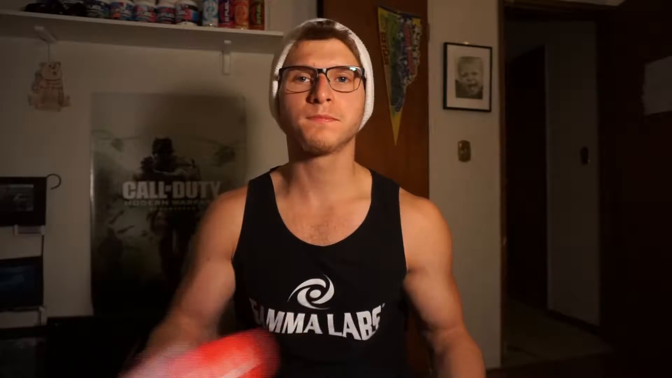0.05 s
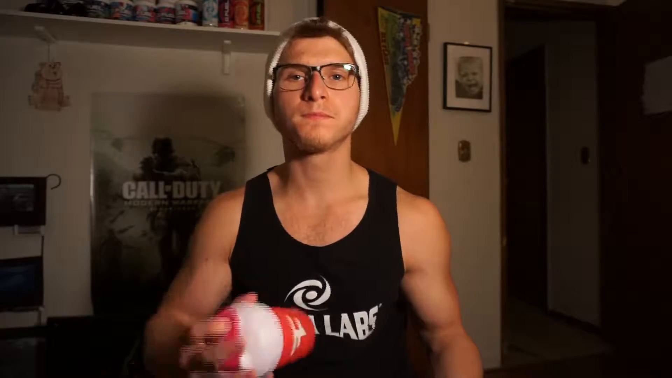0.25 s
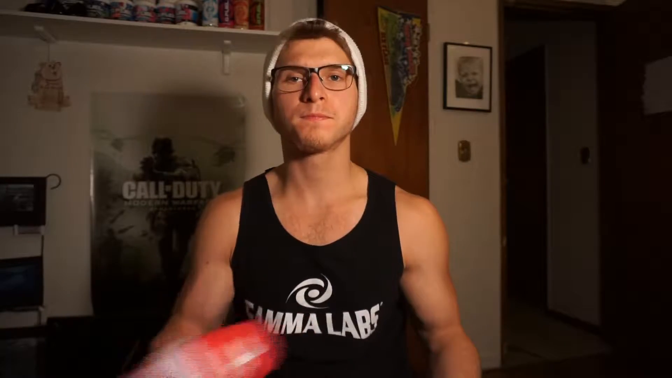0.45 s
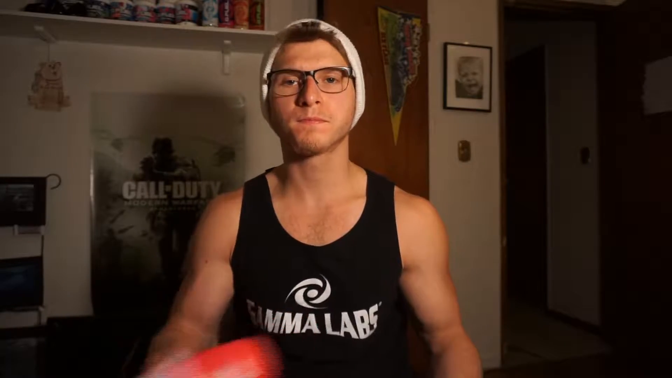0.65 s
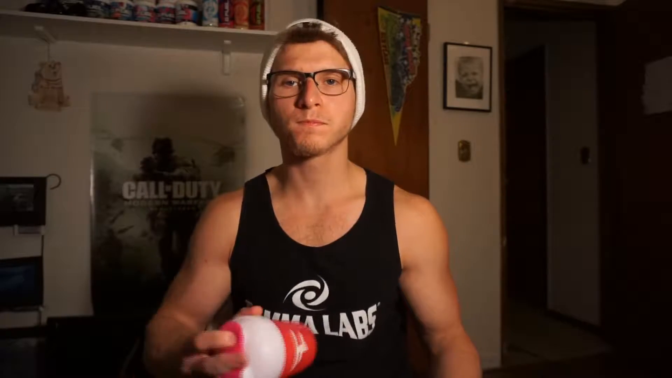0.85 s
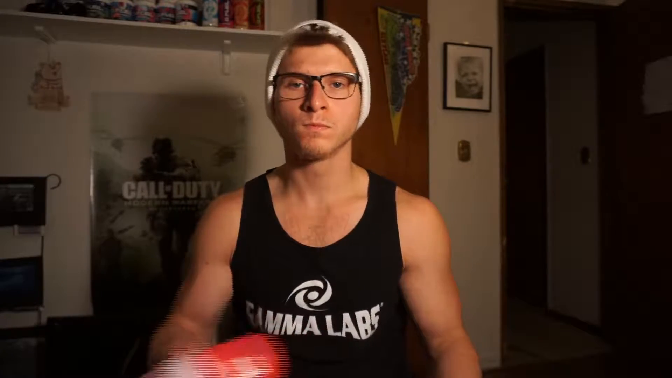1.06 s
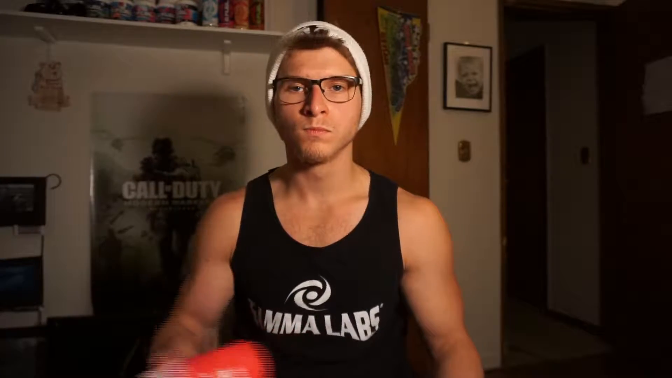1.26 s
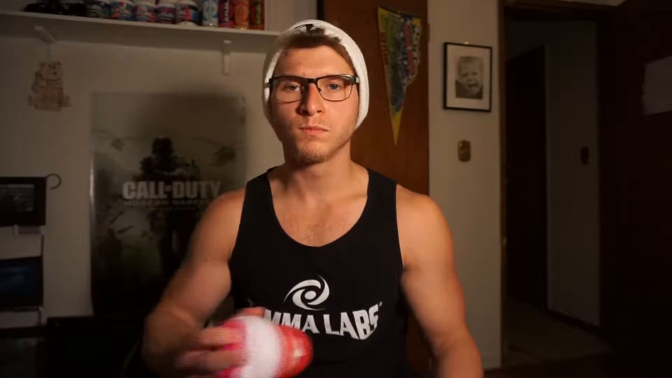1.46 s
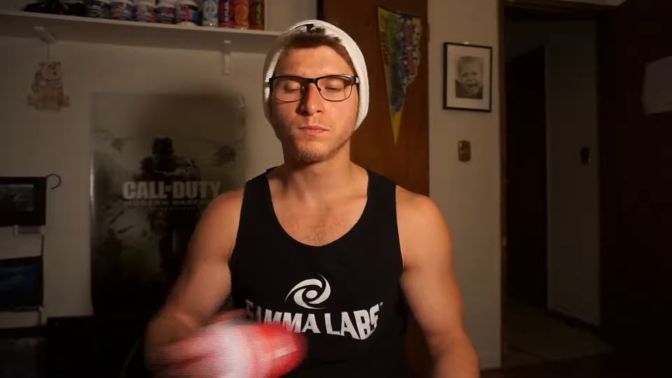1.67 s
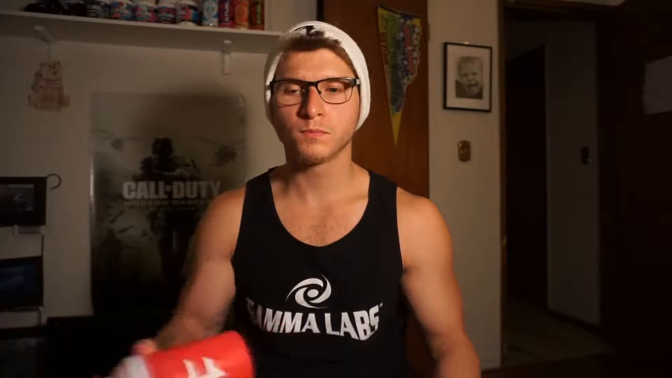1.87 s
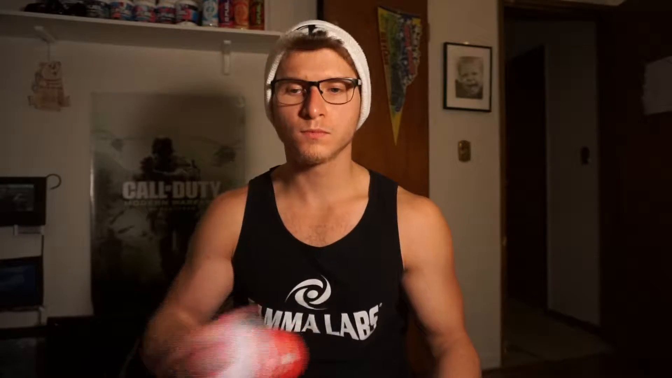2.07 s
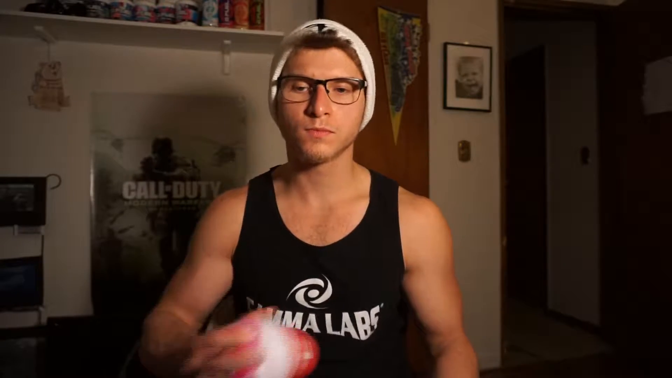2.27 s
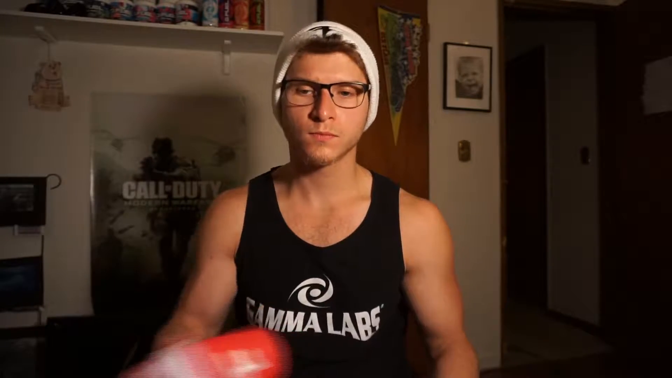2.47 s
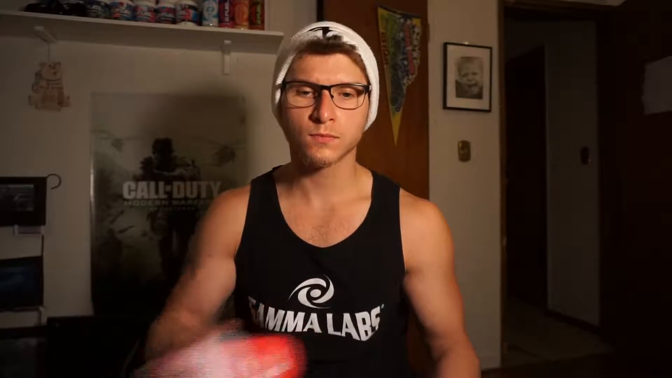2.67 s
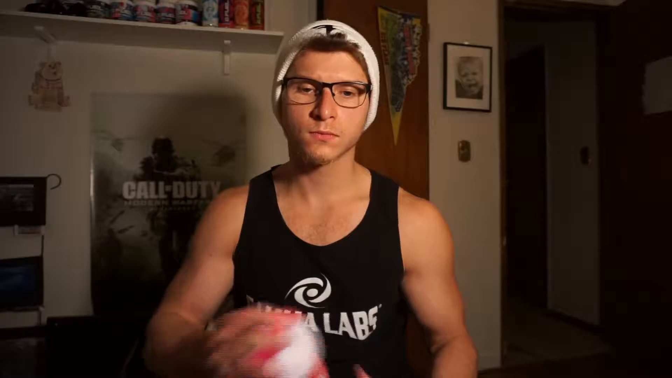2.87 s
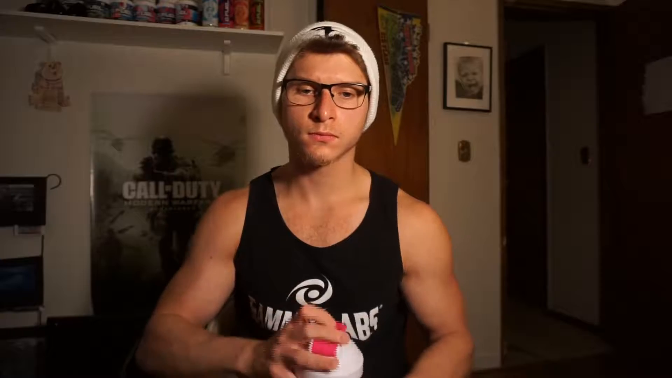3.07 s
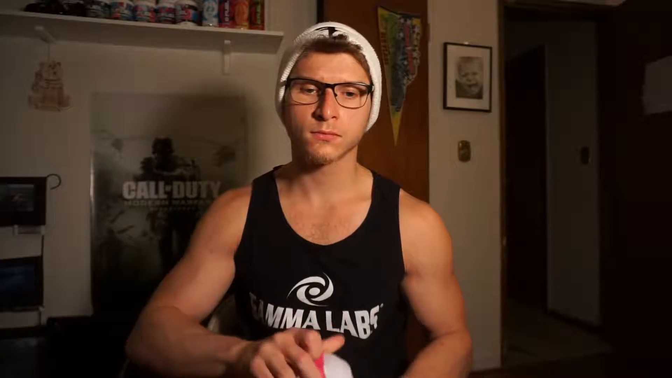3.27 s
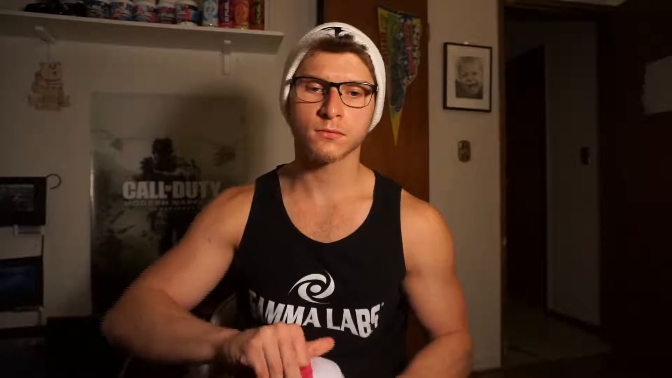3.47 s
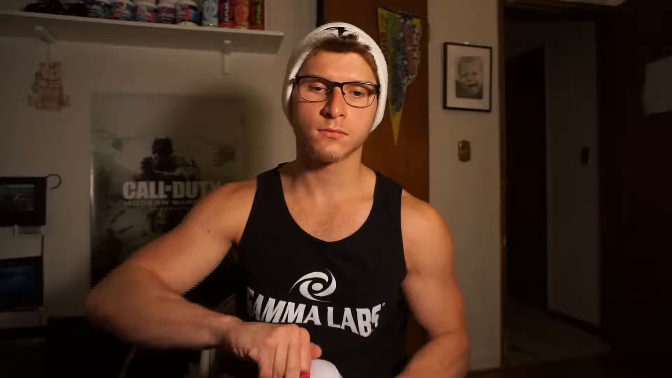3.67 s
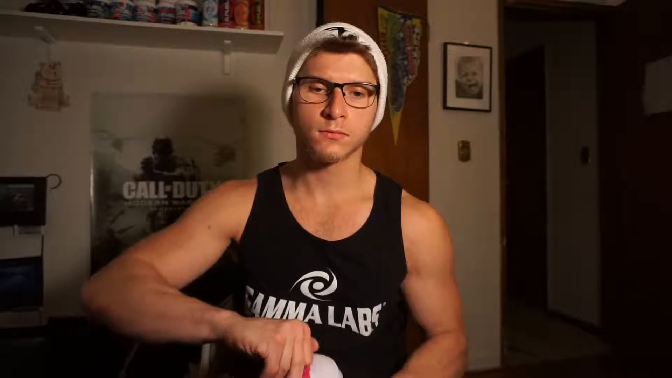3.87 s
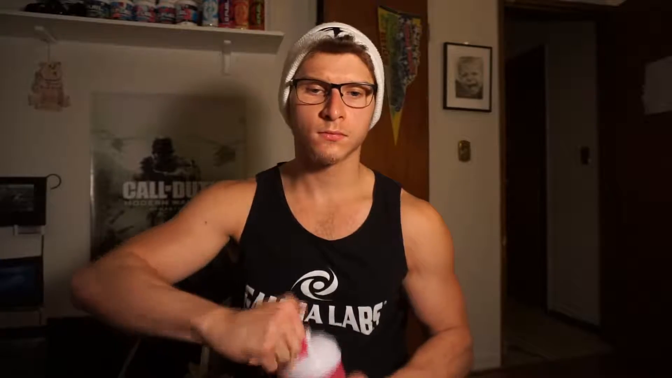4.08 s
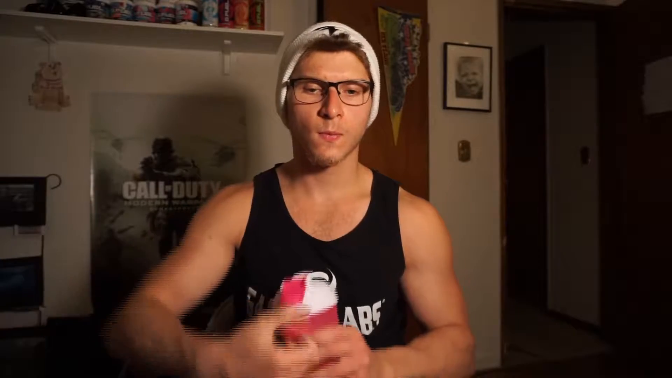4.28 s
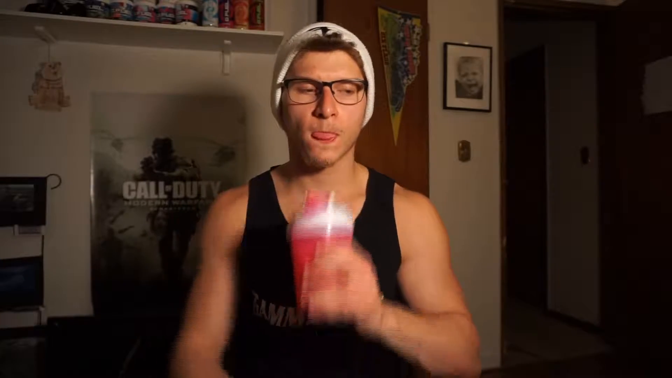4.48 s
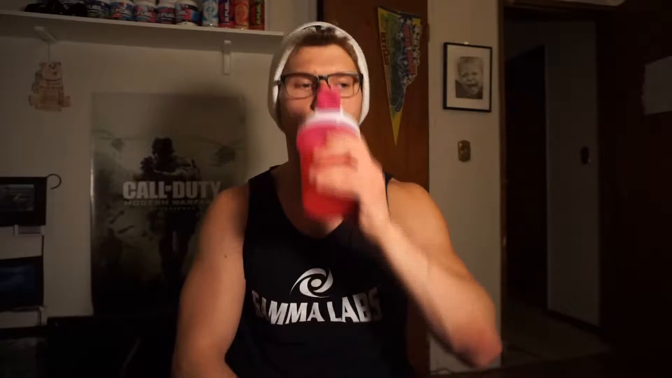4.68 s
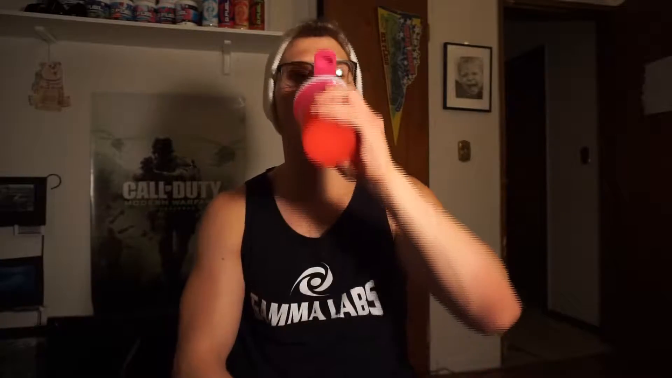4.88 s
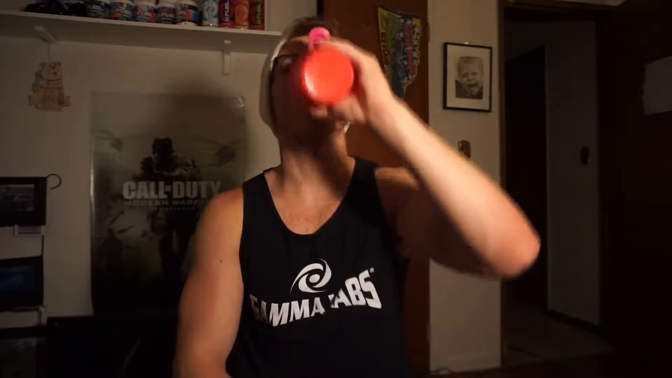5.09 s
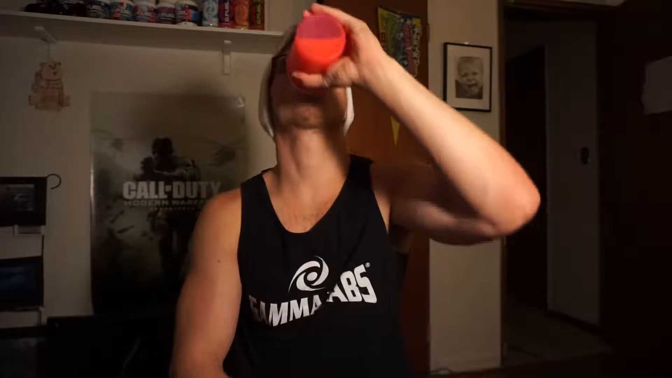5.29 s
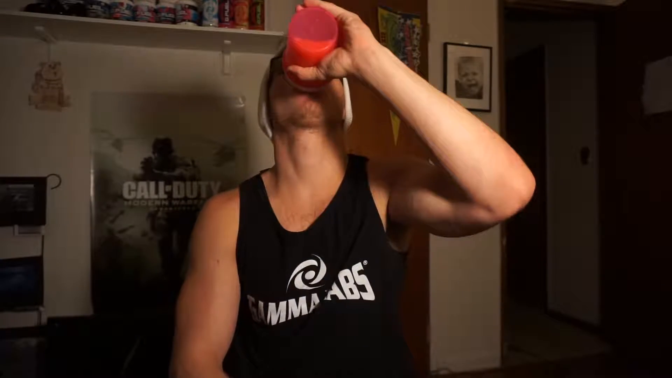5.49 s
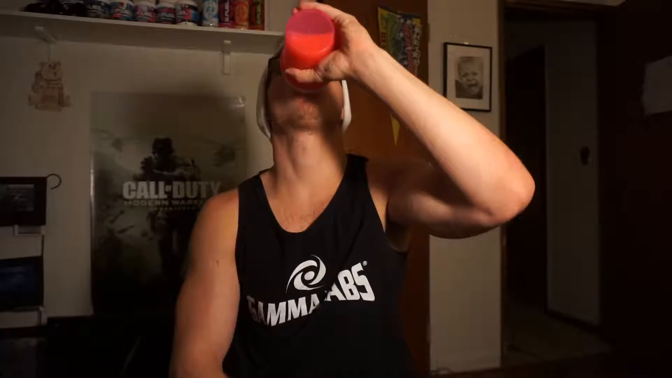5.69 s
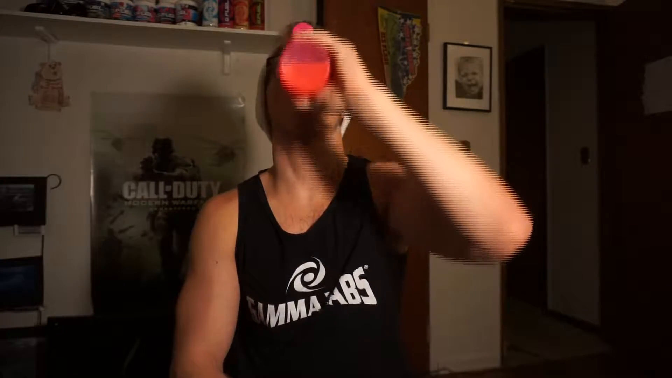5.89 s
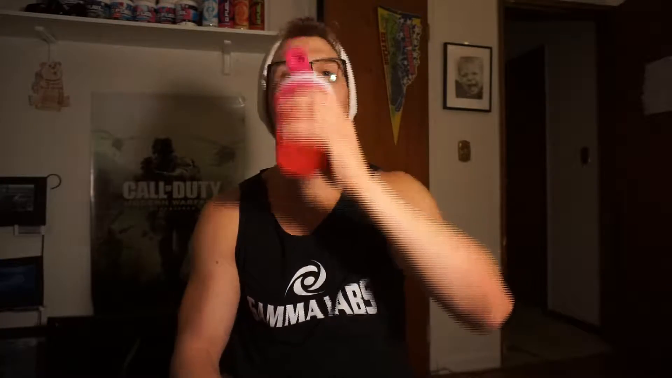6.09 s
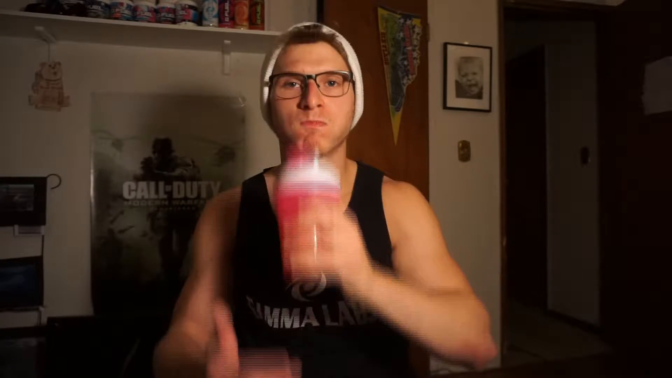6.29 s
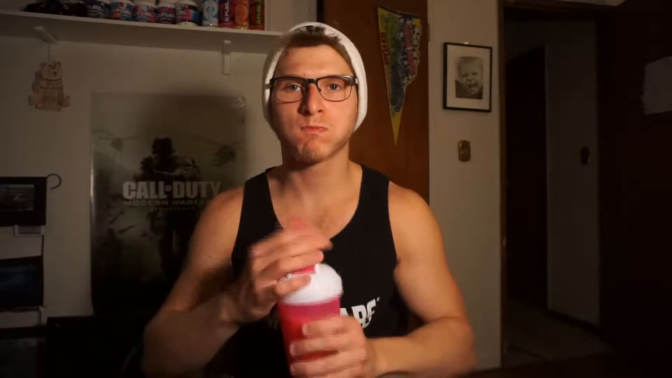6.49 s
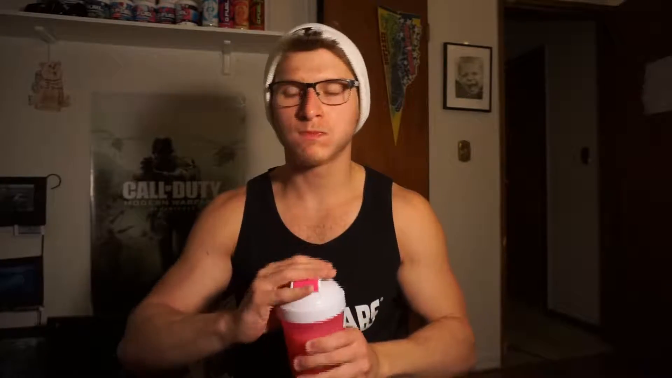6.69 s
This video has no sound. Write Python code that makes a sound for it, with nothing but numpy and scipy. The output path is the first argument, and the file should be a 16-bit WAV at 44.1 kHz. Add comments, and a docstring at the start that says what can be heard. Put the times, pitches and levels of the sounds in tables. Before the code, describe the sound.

Close up in a small room, a plastic bottle of liquid and ice is shaken hard about seven times a second for nearly three seconds. The slosh dies away to near quiet, the flip cap pops open, ice knocks softly and air gulps as the bottle tips up and back, then the cap snaps shut with several clicks. Faint room tone.

```python
"""Fast, hard shakes of a plastic bottle with drink and ice come first, close up in a small room.
Each stroke slams ice and drink into one end: random contacts excite bottle resonances over noise spray.
Then the slosh settles, the flip cap pops open, and the bottle tips up and down with ice knocking inside;
air-space gulps follow the tilt, and the cap is pressed shut. Knocks and snaps are damped sines with
filtered clicks or noise; close echoes, a decaying room tail and a soft room tone surround them."""
import sys
import numpy as np
from scipy import signal
from scipy.fft import rfft, irfft, next_fast_len
from scipy.io import wavfile
from scipy.ndimage import map_coordinates

SR = 44100
rng = np.random.default_rng(int(sys.argv[2]) if len(sys.argv) > 2 else 0)


def generate_wav(signal):
    """Clip the signal to [-1, 1] and save it as 16-bit WAV at the path in sys.argv[1]."""
    frames = np.transpose(np.atleast_2d(signal))
    scaled = np.clip(frames, -1, 1) * 32767
    pcm = np.round(scaled).astype(np.int16)
    wavfile.write(sys.argv[1], SR, pcm)


N = 297359
T = np.arange(N) / SR

# Levels in the tables are relative, ahead of the mix.
# Shaking strokes: [first ice knock t/s, knock level/dB, stroke level/dB, belly over stroke level/dB,
# spray over stroke level/dB, favoured f/Hz, rise t/s, hold t/s]
SHAKE_STROKES = [(-0.02, -60, -18.5, -4, -10, 1380, 0.0028, 0.012),
                 (0.11, -15.5, -20, -1.5, -9, 900, 0.00077, 0.018),
                 (0.241, -8, -19.5, -4, -10, 890, .002, .028),
                 (0.397, -3, -21, -4.5, -12, 520, 0.0055, 0.031),
                 (0.533, -14, -21, -2.5, -7.5, 824, 0.0061, 0.042),
                 (0.698, -18.5, -21.5, -1.5, -7.5, 443, 0.0034, .02),
                 (0.839, -8, -21.5, -2, -9, 894, 0.0083, 0.03),
                 (0.999, -12, -20.5, -4, -8, 505, 0.0099, 0.034),
                 (1.133, -14, -25.5, -7, -13.5, 1600, 0.0035, 0.073),
                 (1.277, -14, -26, -3, -11, 840, 0.0035, 0.036),
                 (1.435, -10.5, -21, -5, -8.5, 1580, 0.0021, 0.044),
                 (1.587, -17, -21, -3, -9.5, 880, 0.0091, 0.023),
                 (1.723, -6.5, -21, -5.5, -13, 1500, 0.0028, 0.046),
                 (1.868, -15.5, -20, -2.5, -7, 1610, 0.0061, 0.026),
                 (1.991, -5, -22, -4, -10.5, 856, 0.002, 0.064),
                 (2.146, -12.5, -21, -3.5, -9.5, 494, 0.0021, 0.027),
                 (2.283, -10.5, -22, -5.5, -10, 1660, .005, 0.041),
                 (2.437, -15, -23, -2.5, -10.5, 530, 0.014, 0.036),
                 (2.572, -6.5, -19.5, -6.5, -9, 1550, 0.0084, 0.049),
                 (2.705, -14, -20.5, -5, -9.5, 940, 0.0082, 0.049),
                 (2.839, -18, -22.5, -3.5, -10, 1410, 0.0049, 0.062)]
# Gentle sloshing, joined by straight lines: [t/s, level/dB, spray over it level/dB]
SLOSH_LEVELS = [(2.9, -29, -7), (2.97, -27, -15), (3.081, -24.5, -17.5), (3.16, -39, -10),
                (3.242, -40, -13.5), (3.42, -51.5, -10), (3.75, -71.5, -15), (3.939, -68, 2.5),
                (4.101, -54, -5.5), (4.6, -61.5, -16), (4.74, -60.5, 2.5), (4.88, -60.5, -14),
                (5.13, -57.5, -22), (5.22, -64, -12), (5.27, -54.5, -4.5), (5.42, -42.5, -14),
                (5.62, -53, -7.5), (5.97, -62, -6), (6.12, -39.5, -10.5), (6.25, -33.5, -8),
                (6.51, -58, -15.5), (6.74, -45, -5)]
# Sudden lurches of the ice and drink: [t/s, level/dB, spray over it level/dB, t60/s]
ICE_LURCHES = [(4.03, -35.5, -4, 0.28), (4.21, -46, -24, 0.39), (4.39, -44, -8, 0.31),
               (4.668, -46, -24, 0.21), (5.091, -46.5, -31, 0.24), (5.466, -36, -16, 0.36),
               (5.70, -48.5, -9.5, 1), (5.86, -49.5, -4, 0.26), (6.049, -33.5, -19, 0.41),
               (6.538, -35, -7.5, 0.5), (6.619, -35, -25, 0.3), (6.692, -30.5, -15.5, 0.22)]
# Tilt, setting the air space and where the ice slides:
# [t/s, air f/Hz, gulps over slosh level/dB, wall f/Hz]
BOTTLE_TILT = [(2.9, 545, -5.5, 1800), (3.1, 522, -6.5, 1790), (3.229, 484, 2.5, 1600), (4.0, 577, 2, 1800),
               (4.04, 323, 7, 2270), (4.4, 364, 5, 2460), (4.62, 350, 12.5, 1590), (4.88, 315, 15.5, 1800),
               (5.13, 564, -3, 1670), (5.5, 606, -5, 1760), (5.75, 590, -13, 2280), (6.06, 558, 0, 2120),
               (6.14, 494, -2.5, 1730), (6.25, 414, 2.5, 1670), (6.74, 376, -0.5, 2280)]
# Single ice knocks besides the first of each stroke: [t/s, level/dB, f/Hz]
ICE_KNOCKS = [(0.258, -6, 866), (0.403, -7.5, 1340), (0.602, -8.5, 850), (0.708, -5.5, 700),
              (0.858, -4, 860), (1.019, -8.5, 860), (1.138, -4.5, 1660), (1.467, -6.5, 1560),
              (2.002, -5.5, 870), (2.011, -20, 780), (2.292, -4, 1610), (2.304, -4.5, 1620),
              (2.852, -5.5, 1530), (2.893, -9, 1200), (3.038, -13, 1880), (3.503, -29, 2100),
              (3.63, -42, 920), (4.21, -32.5, 2660), (4.241, -29, 2260), (4.392, -36, 2590),
              (4.525, -33, 746), (4.67, -27, 1310), (4.949, -37, 748), (4.994, -33, 780),
              (5.051, -31, 1950), (5.093, -33, 845), (5.181, -31, 1980), (5.303, -30, 1920),
              (5.398, -28, 1230), (5.445, -24, 875), (5.464, -20, 725), (5.467, -17, 3200),
              (5.703, -35, 1970), (5.87, -34, 2450), (6.003, -31, 670), (6.05, -43, 2030),
              (6.244, -19, 1600), (6.269, -18, 1970), (6.318, -15.5, 1930), (6.339, -21, 1230),
              (6.436, -31, 1930)]
# Cap snaps and handling knocks: [t/s, level/dB, pop over it level/dB, pop f/Hz, rattle tail over it level/dB]
CAP_HITS = [(4.0279, -20, 0.5, 252.4, -13.5), (4.0428, -24, 5, 270, -20), (4.6692, -31, -15, 418, -30),
            (4.7965, -42, 6.5, 382, -29), (6.539, -14, -10, 357, -17.5), (6.6201, -16, -11, 382, -26),
            (6.6911, -13, -33, 444, -19)]
# Ringing modes of the cap: [f/Hz, level/dB, t60/s]
CAP_MODES = [(1370, -20, .04), (2000, 3, 0.045), (2394, 3.5, 0.03), (2800, -8, .04), (3720, -11, 0.05)]
# Resonances of the air and base: [f/Hz, width/Hz, level/dB]
BELLY_MODES = [(381, 48, -6), (489.4, 57, 0.5), (684, 65, -3), (839, 102, 0)]
# Resonances of the wall and lid: [f/Hz, width/Hz, level/dB]
WALL_MODES = [(1270, 248, -3), (1650, 159, -4), (1956, 320, -2), (2460, 317, -2.5), (3224, 690, -9.5)]
# Spectrum of the spray in hard shaking: [f/Hz, level/dB]
SPRAY_SPECTRUM = [(1650, -53), (2800, -3), (6970, -17), (8120, -17.5), (9530, -21), (13500, -22),
                  (15100, -25.5), (16000, -34)]
# Spectrum of the spray in slow sloshing: [f/Hz, level/dB]
DRIP_SPECTRUM = [(1650, -41), (2800, -1.5), (7070, -14.5), (11000, -20), (14200, -24.5), (16000, -47)]
# Spectrum of the whole bottle jerking: [f/Hz, level/dB]
JERK_SPECTRUM = [(15, -68), (25, -23), (49, -16), (157, -10), (270, -0.5), (340, -0.5), (440, -12),
                 (750, -120)]
# One big air bubble: [t/s, level/dB, start f/Hz, end f/Hz, length/s]
AIR_BUBBLE = (6.105, -41, 150, 250, .05)
# The arm jolts the desk: [t/s, level/dB, t60/s]
DESK_BUMPS = [(4.03, -40.5, 0.16), (4.665, -51, 0.45), (6.688, -44, 0.2)]
# Spectrum of a desk bump: [f/Hz, level/dB]
BUMP_SPECTRUM = [(15, -38), (60, -11), (120, -6), (200, -4), (400, -120)]
# Decay of the room's tail: [f/Hz, t60/s]
ROOM_DECAY = [(200, 0.52), (2000, 0.4), (10000, 0.064)]
# Spectrum of the room tone: [f/Hz, level/dB]
HUSH_SPECTRUM = [(15, -36), (25, -3), (70, -2), (108, 1.5), (270, -9.5), (439, -3), (3080, -18),
                 (5570, -22), (6920, -27), (14000, -27.5), (16000, -36.5)]
# Gain of the echoes and room tone in the side signal: [f/Hz, level/dB]
SIDE_GAIN = [(40, -21), (120, -21), (250, -18), (700, -7), (1500, -6.5), (3500, -0.5), (6000, 0)]

LEAD_RISES = 1.68  # the drink arrives this many rise times before the first cube
RUNOFF_S, RUNOFF_S_PER_DB = 0.42, 0.0392  # run-off t60 of a -22 dB stroke; weak strokes drain more slowly
FIRST_HZ, FIRST_PULL = 1693, 0.158  # pitch of a first knock and its pull toward the favoured pitch
HUSH_DB = -61
TOP_HZ = 15850


def shaking():
    """Ice and drink hit the end at once, rattle on for a moment, then run off."""
    power, focus_hz = np.zeros((3, N)), np.zeros(N)
    slow = np.array([[1], [1], [1.3]])  # spray builds and fades later than the rattle
    for s, _, db, belly_db, spray_db, hz, rise, hold in SHAKE_STROKES:
        s -= LEAD_RISES * rise
        a = max(round(s * SR), 0)
        t = T[a:][:SR // 2] - s
        t60 = RUNOFF_S - RUNOFF_S_PER_DB * (db + 22)
        build = 1 - np.exp(-np.abs(t / rise / slow ** 2))
        runoff = amp(-60 * np.clip(t - hold, 0, None) / t60 / slow)
        level = amp(db + np.array([[belly_db], [0], [spray_db]]))
        power[:, a:][:, :SR // 2] += (level * build * runoff) ** 2
        focus_hz[a:] = hz
    belly, wall, spray = np.sqrt(power)

    lumps = amp(0.46 * map_coordinates(rng.standard_normal(600), [T * 70]))  # cubes arrive in bunches
    knocks = rattle(900, spread_db=1.0, wash=0.77)
    low_hz = np.where(focus_hz < 1050, focus_hz, 484)  # each stroke favours one resonance
    high_hz = np.where(focus_hz < 1050, 1250, focus_hz)
    base = 1.21 * clacks(count=900, t0=0, t1=3.4, modes=BELLY_MODES, focus_hz=low_hz,
                         share=0.32, spread_db=3.5, scatter=0.034, longest=0.033)
    lid = 0.77 * clacks(count=1800, t0=0, t1=3.4, modes=WALL_MODES, focus_hz=high_hz,
                        share=0.4, spread_db=0.5, scatter=0.012, longest=0.018)
    base = base + 0.55 * unit(resonant(knocks, BELLY_MODES))
    lid = lid + 0.55 * unit(resonant(knocks, WALL_MODES))

    fizz = droplets(spray, SPRAY_SPECTRUM, spread_db=3)
    jerk = unit(coloured(rng.standard_normal(N), JERK_SPECTRUM))
    fizz[0] += amp(-24.5) * belly * jerk  # the whole bottle jerks too
    return lumps * (belly * base + wall * lid), fizz


def sloshing():
    """Drink and ice slide along the wall; small gulps ring the air space, whose pitch follows the tilt."""
    s, level_db, spray_db = np.transpose(SLOSH_LEVELS)
    tilt_s, air_hz, air_db, wall_hz = np.transpose(BOTTLE_TILT)
    power = amp([np.interp(T, s, level_db), np.interp(T, s, level_db + spray_db)]) ** 2
    for at, db, wet_db, t60 in ICE_LURCHES:
        a = round(at * SR)
        t = T[a:][:SR // 2] - at
        power[:, a:][:, :SR // 2] += amp(db + np.array([[0], [wet_db]]) - 60 * t / t60) ** 2
    level, spray = np.sqrt(power)
    fade_in = np.clip((T - s[0]) / 0.16, 0, 1)

    modes = BELLY_MODES[3:] + WALL_MODES
    lap = rattle(440, spread_db=6, wash=0.16)
    slide = clacks(count=2400, t0=2.9, t1=6.72, modes=modes, focus_hz=np.interp(T, tilt_s, wall_hz),
                   share=0.6, spread_db=2, scatter=0.257, longest=0.049)
    wall = level * (0.64 * slide + 0.44 * unit(resonant(lap, modes)))
    gulps = clacks(count=600, t0=2.9, t1=6.72, modes=[(420, 55, 0)], focus_hz=np.interp(T, tilt_s, air_hz),
                   share=0.97, spread_db=1.5, scatter=0.073, longest=0.07)
    gulps *= level * amp(np.interp(T, tilt_s, air_db))
    return fade_in * (wall + gulps), droplets(fade_in * spray, DRIP_SPECTRUM, spread_db=12)


def ice():
    """A cube hits the wall: a short ring near its own pitch, the bottle's modes beside it and a thin crack."""
    first = [(s, db, FIRST_HZ * (hz / FIRST_HZ) ** FIRST_PULL)
             for s, db, *_, hz, rise, hold in SHAKE_STROKES if s > 0]
    s, db, hz = np.transpose(first + list(ICE_KNOCKS))
    taps = np.bincount(np.round(s * SR).astype(int), amp(db + 22), N)
    taps = filtered(taps, lambda f: 1 / (1 + 1j * f / 4500) ** 2)  # wet contact is slightly soft
    ring = rings(s, db - 4, hz, t60=np.full(len(s), 0.02))
    crack = amp(-22) * coloured(taps, DRIP_SPECTRUM)
    return ring + resonant(taps, BELLY_MODES[3:] + WALL_MODES) + crack


def cap():
    """Each snap or knock rings the cap, pops the air inside and leaves a short rattle."""
    hit_s, hit_db, pop_db, pop_hz, tail_db = np.transpose(CAP_HITS)
    hits = rings(hit_s, hit_db + pop_db, pop_hz, t60=np.full(len(hit_s), 0.22))
    hz, mode_db, t60 = np.transpose(CAP_MODES)
    rustle = np.zeros(N)
    for s, db, rattle_db in zip(hit_s, hit_db, tail_db):
        uneven_db = rng.normal(0, 2.0, len(hz))
        hits += rings(np.full(len(hz), s), db - 11 + mode_db + uneven_db, hz, t60)
        t = np.clip(T - s, 0, None)
        click = amp(db - 23 - 60 * t / 0.0089)
        rustle += (t > 0) * (click + amp(db + rattle_db - 60 * t / 0.17))
    noise = resonant(rng.standard_normal(N), WALL_MODES + [(4860, 1540, -13)])
    return hits + rustle * unit(noise)


def glug():
    """One air bubble whose pitch rises as it surfaces, swelling and fading as half a sine."""
    s, db, start_hz, end_hz, length = AIR_BUBBLE
    u = np.clip((T - s) / length, 0, 1)
    phase = 2 * np.pi * np.cumsum(start_hz + (end_hz - start_hz) * u) / SR
    return amp(db) * np.sin(np.pi * u) * np.sin(phase)


def desk_bumps():
    """Soft desk bumps: low noise that starts at once and dies away."""
    push = sum((T > s) * amp(db - 60 * np.abs(T - s) / t60) for s, db, t60 in DESK_BUMPS)
    return push * unit(coloured(rng.standard_normal(N), BUMP_SPECTRUM))


def close_echoes(bottle):
    """Reflections off near walls: short noise bursts whose pattern changes as the bottle moves."""
    near, step = np.zeros(N + SR), 2048
    for a in range(0, N, step):  # overlapping pieces crossfade from one pattern to the next
        piece = bottle[a:a + 2 * step] * np.hanning(2 * step)[:N - a]
        echo = rng.standard_normal(900) * amp(-60 * T[:900] / 0.0093)
        near[a:][:len(piece) + 899] += signal.fftconvolve(piece, echo / np.linalg.norm(echo))
    return near[:N]


def room_tail(bottle):
    """The small room rings on: two unlike noise tails whose frequency bands die at their own speeds."""
    hz, t, z = signal.stft(rng.standard_normal((2, SR // 2)), SR, nperseg=128)
    h = signal.istft(z * amp(-60 * t / along(ROOM_DECAY, hz)[:, None]), SR, nperseg=128)[1]
    h /= np.linalg.norm(h, axis=1, keepdims=True)
    return signal.fftconvolve(bottle[None], h, axes=1)[:, :N]


def room_tone():
    """Steady soft noise behind everything, independent in mid and side."""
    return amp(HUSH_DB) * unit(coloured(rng.standard_normal((2, N)), HUSH_SPECTRUM))


def clacks(count, t0, t1, modes, focus_hz, share, spread_db, scatter, longest):
    """Small collisions, each ringing a bottle resonance or the one that the moment favours; rms about 1."""
    u, g = rng.random((count, 3)), rng.standard_normal((count, 2))
    s = t0 + (t1 - t0) * u[:, 0]
    hz, width, db = np.transpose(modes)
    weight = np.cumsum(amp(2 * db) * width)  # strong, broad resonances are picked more often
    pick = np.minimum(np.searchsorted(weight / weight[-1], u[:, 1]), len(hz) - 1)
    favoured = focus_hz[(s * SR).astype(int)] * np.exp(scatter * g[:, 0])
    pitch = np.where(u[:, 2] < share, favoured, hz[pick] + width[pick] * g[:, 0] / 2)
    t60 = np.minimum(np.log(1000) / np.pi / width[pick], longest)  # narrow resonances ring longer
    out = rings(s, spread_db * g[:, 1], pitch, t60)
    return out / np.std(out[int(t0 * SR):int(t1 * SR)])


def droplets(level, spectrum, spread_db):
    """Fine spray all over the inside: one share alike at both ports (mid), one unlike (side)."""
    fizz = np.array([rattle(3000, spread_db, wash=1.08), rattle(3000, spread_db, wash=1.17)])
    return level * unit(coloured(fizz, spectrum)) * amp([[0], [-4]])


def rattle(per_s, spread_db, wash):
    """Random contacts of unequal size on a wash of liquid noise."""
    sizes = amp(spread_db * rng.standard_normal(N)) * rng.choice([-1, 1], N)
    hits = (rng.random(N) < per_s / SR) * sizes
    return unit(hits) + wash * rng.standard_normal(N)


def rings(s, db, hz, t60, attack=0.0003):
    """Damped sines with a soft attack (s), one per row, added at their start times."""
    t = np.arange(int(0.7 * SR * t60.max())) / SR
    decay = amp(db[:, None] - 60 * t / t60[:, None])
    wave = decay * np.sin(2 * np.pi * hz[:, None] * t) * (1 - np.exp(-t / attack))
    at = np.round(s * SR).astype(int)[:, None] + np.arange(len(t))
    return np.bincount(at.ravel(), wave.ravel(), N + SR)[:N]


def resonant(x, modes):
    """x through parallel broad resonances of alternating polarity."""
    def response(f):
        return sum((-1) ** k * amp(db) * 1j * f * w / (c * c - f * f + 1j * f * w)
                   for k, (c, w, db) in enumerate(modes))
    return filtered(x, response)


def coloured(x, spectrum):
    """x shaped by the given spectrum."""
    return filtered(x, lambda hz: amp(along(spectrum, hz)))


def filtered(x, response):
    """x times a complex response of frequency."""
    m = next_fast_len(N + SR // 2)
    return irfft(rfft(x, m) * response(np.fft.rfftfreq(m, 1 / SR)), m)[..., :N]


def along(points, hz):
    """Values of (Hz, value) points read along a log frequency axis."""
    f, v = np.transpose(points)
    return np.interp(np.log(hz + 1), np.log(f + 1), v)


def unit(x):
    """x scaled to rms 1."""
    return x / np.sqrt(np.mean(x ** 2) + 1e-20)


def amp(db):
    """Decibels to gain."""
    return 10 ** (np.asarray(db) / 20)


def scene():
    """The moving bottle a little to the left, near walls that widen it, and the room, as left and right."""
    (shake, spray), (slosh, drips) = shaking(), sloshing()
    body = shake + slosh + ice() + cap()
    body = filtered(body, lambda hz: 1 / (1 - 1j * 230 / (hz + 1)) ** 3)  # little remains of the bottle sounds below about 230 Hz
    bottle = body + spray[0] + drips[0] + glug() + desk_bumps()
    room, hush = room_tail(bottle), room_tone()
    mid = bottle + amp(-10.0) * room[0] + hush[0]
    around = close_echoes(bottle) + amp(-13.5) * room[1] + hush[1]
    side = coloured(around, SIDE_GAIN) + spray[1] + drips[1]
    return np.array([mid + side, mid - side]) * amp([[0.4], [-0.4]])


def record(dry):
    """The left port hears the bottle a little earlier; nothing above the band limit is kept."""
    lead_s = np.array([[1], [-1]]) * 2.5e-5
    return filtered(dry, lambda hz: (hz < TOP_HZ) * np.exp(2j * np.pi * hz * lead_s))


dry = scene()
out = record(dry)
generate_wav(out)
```